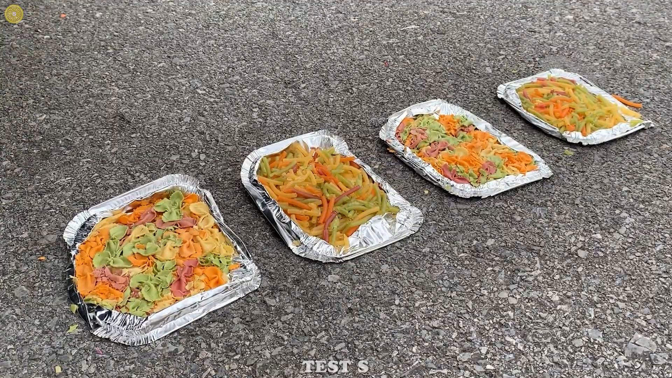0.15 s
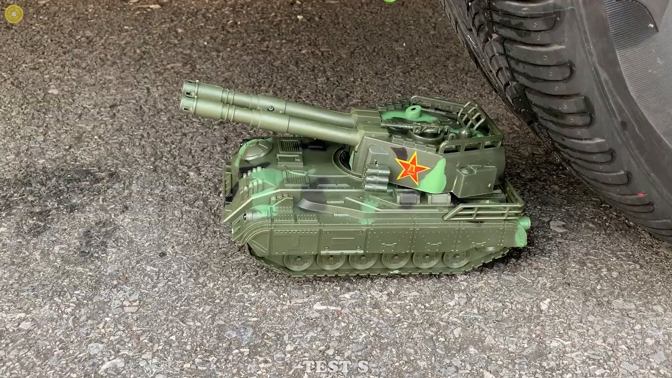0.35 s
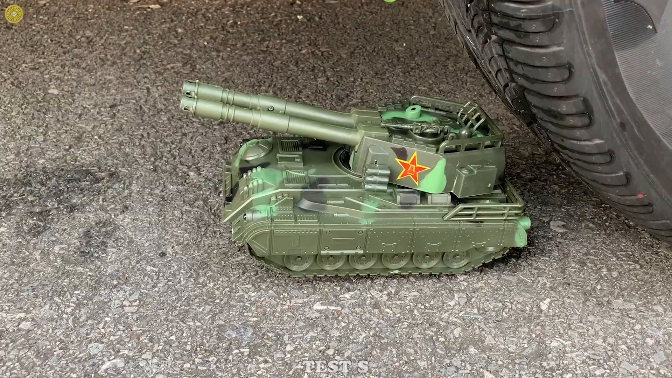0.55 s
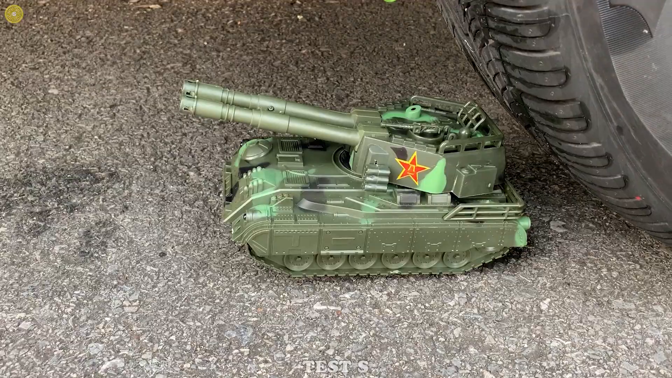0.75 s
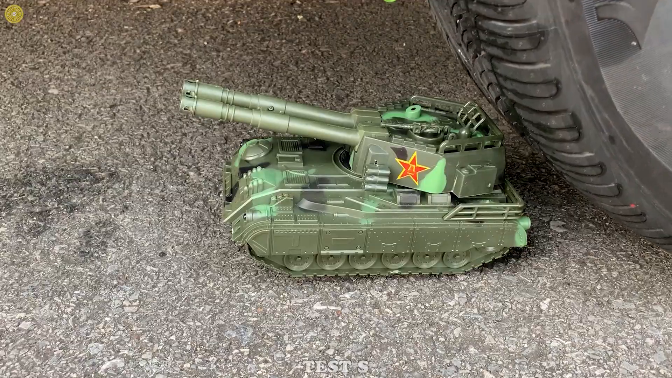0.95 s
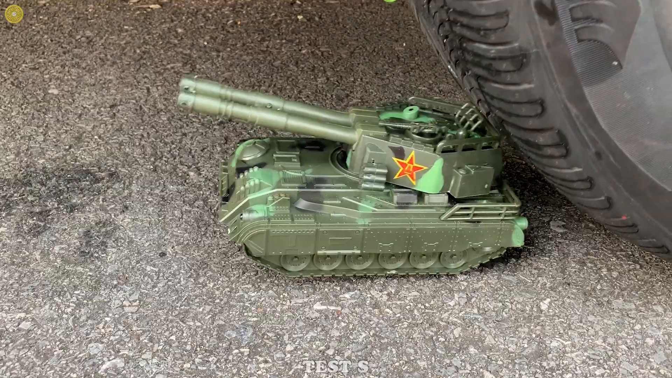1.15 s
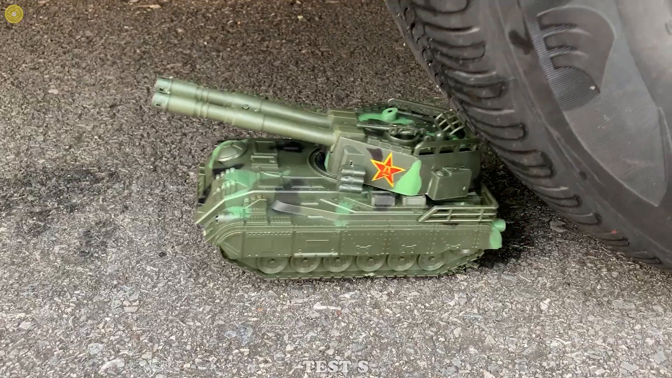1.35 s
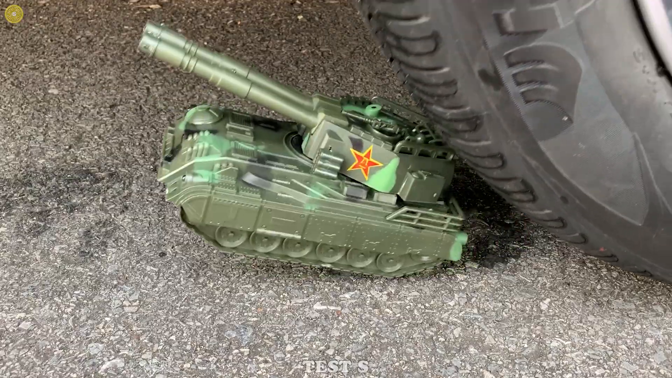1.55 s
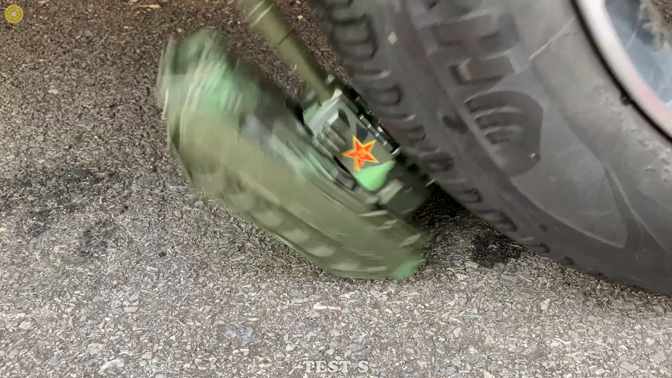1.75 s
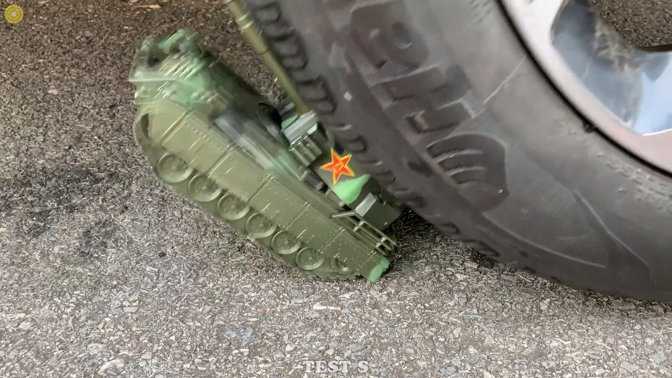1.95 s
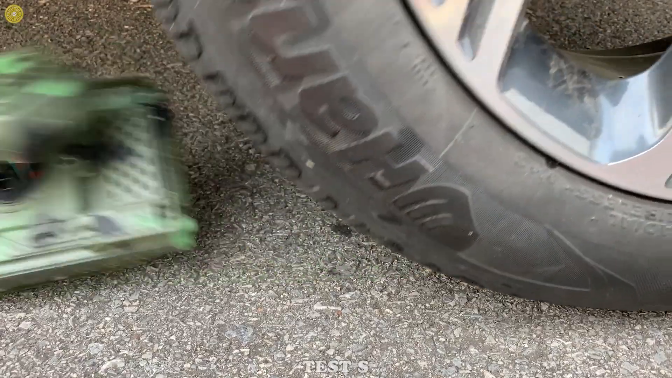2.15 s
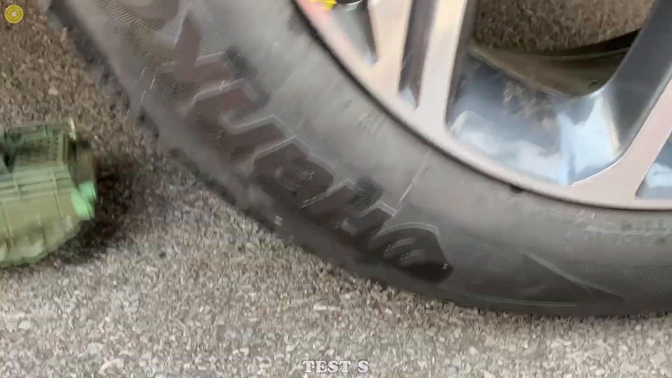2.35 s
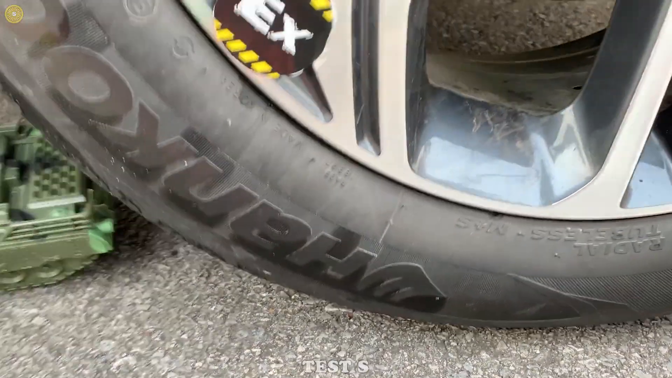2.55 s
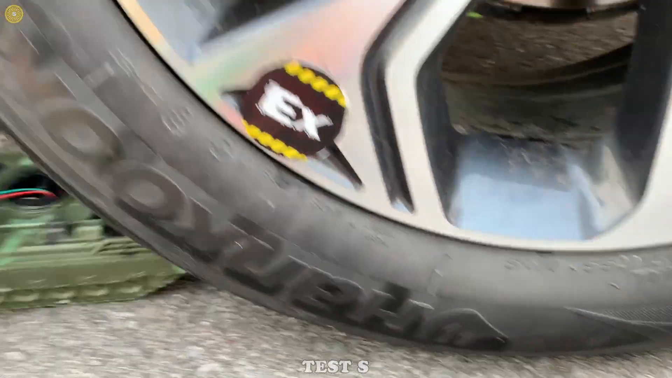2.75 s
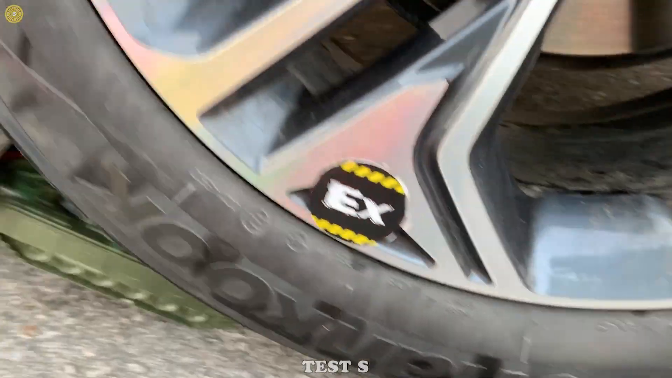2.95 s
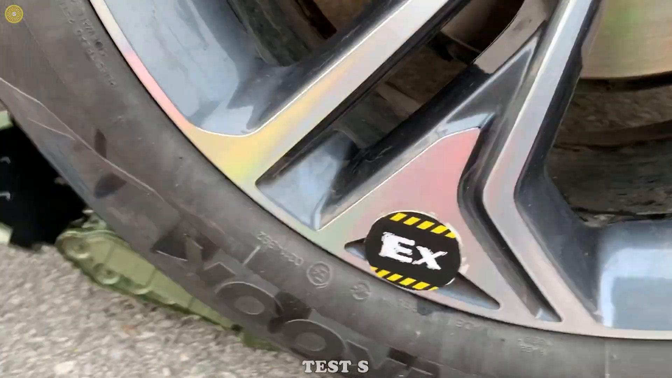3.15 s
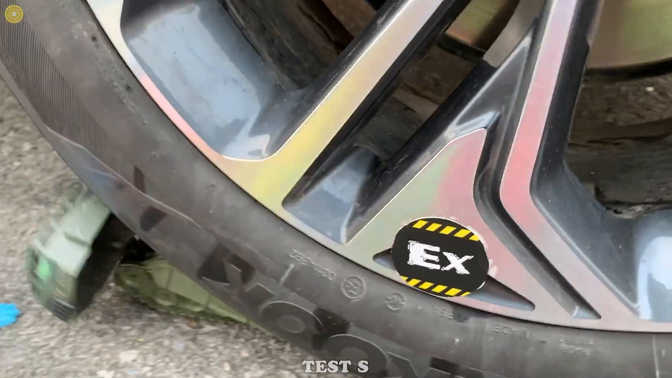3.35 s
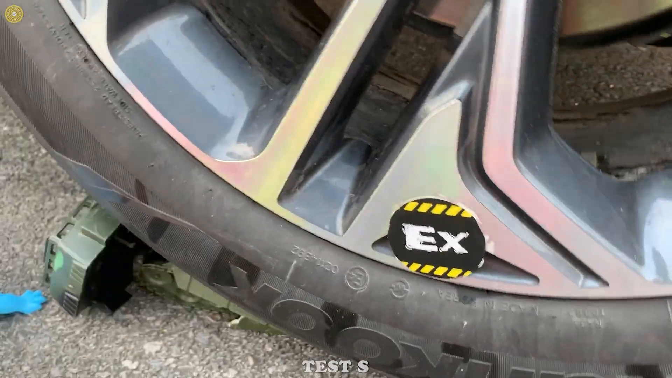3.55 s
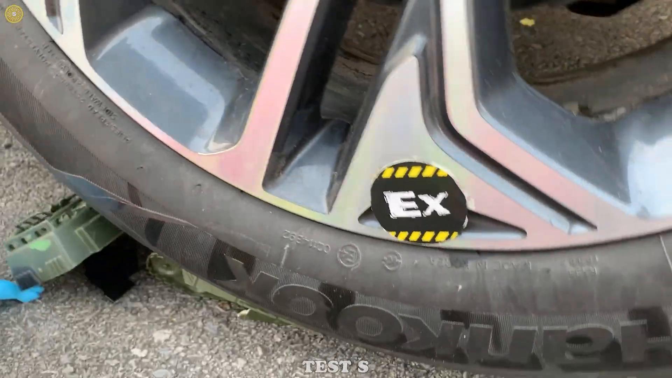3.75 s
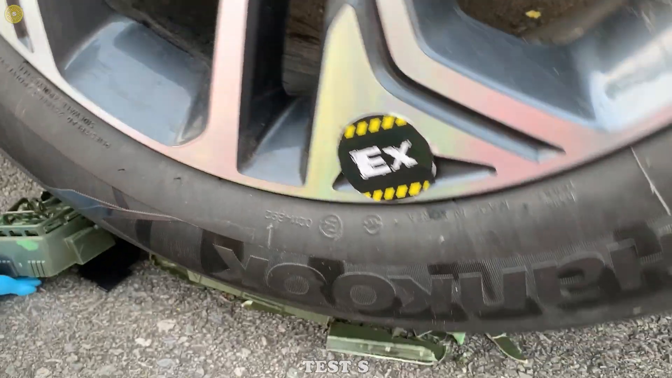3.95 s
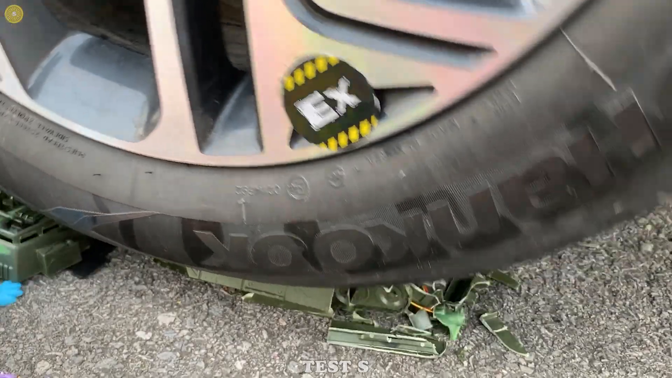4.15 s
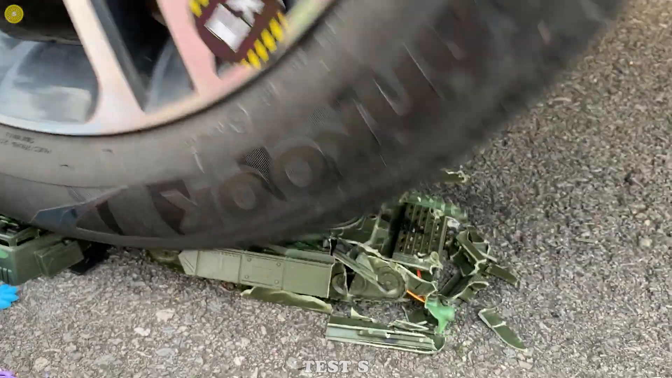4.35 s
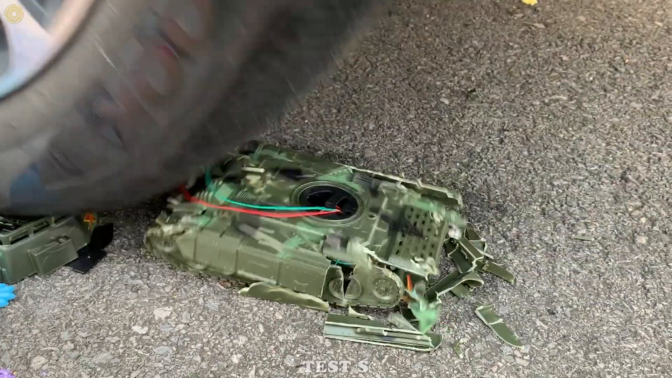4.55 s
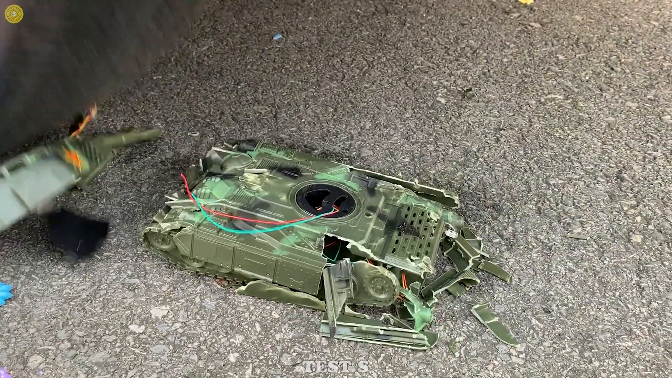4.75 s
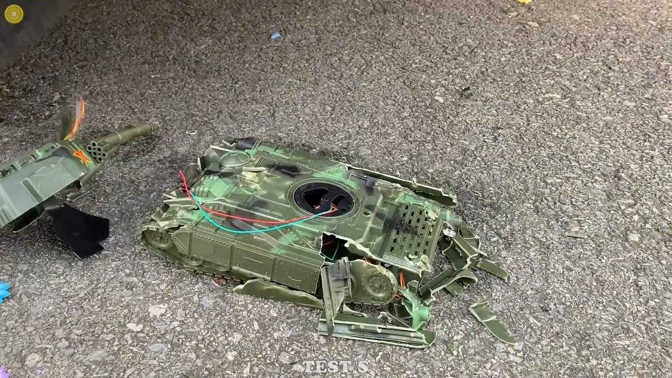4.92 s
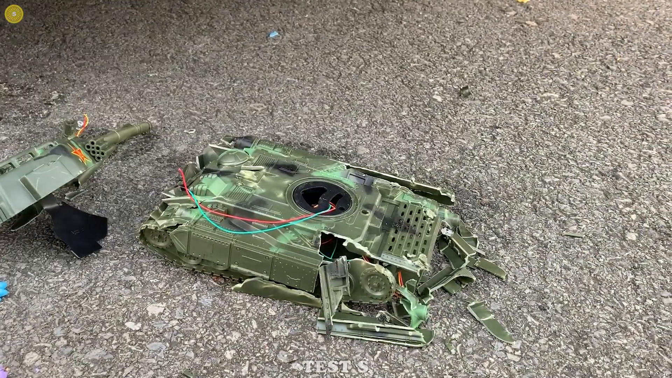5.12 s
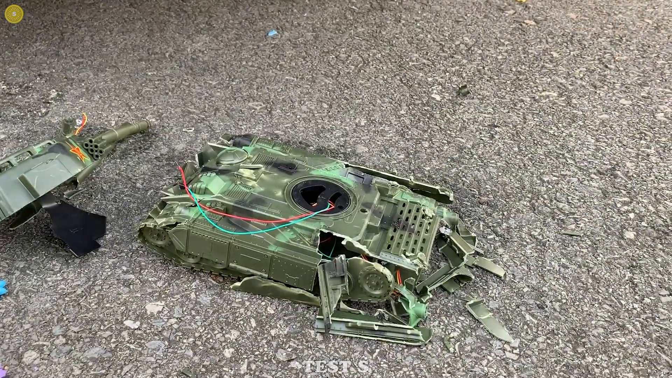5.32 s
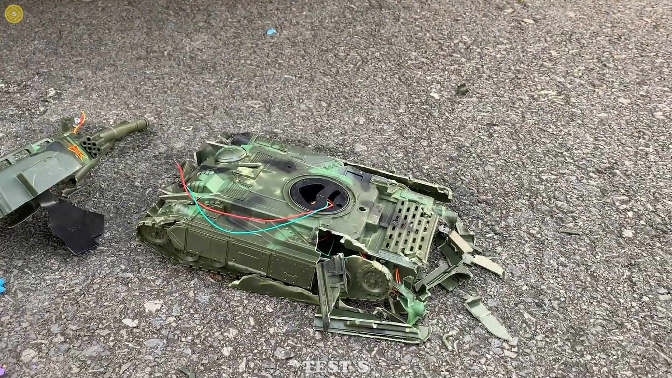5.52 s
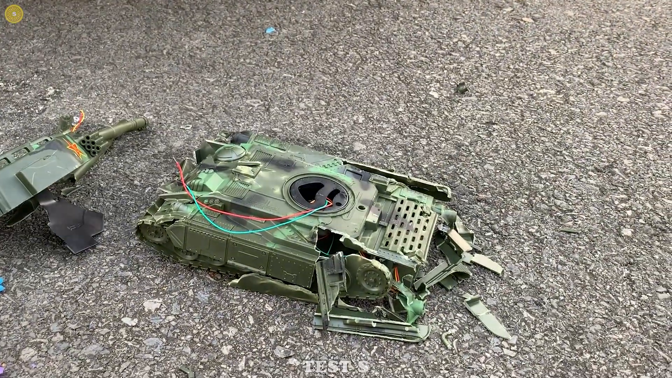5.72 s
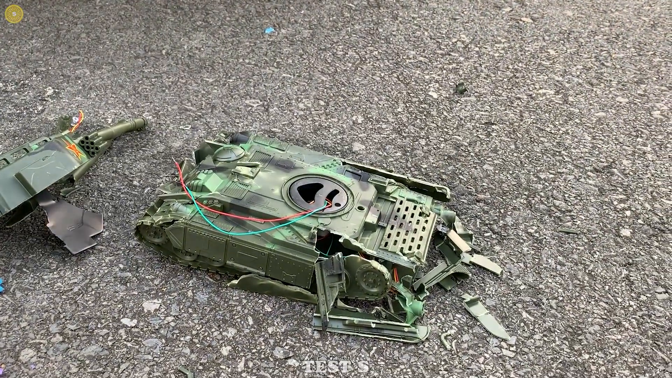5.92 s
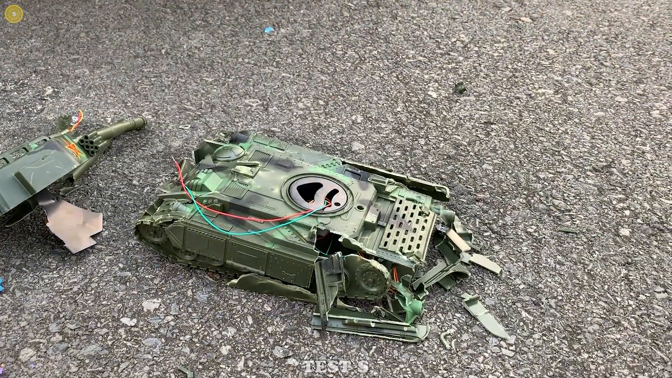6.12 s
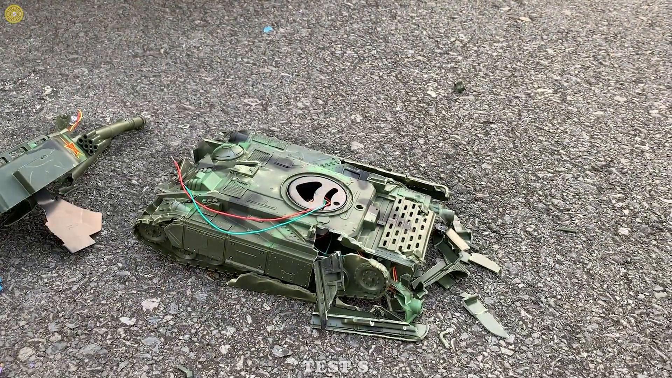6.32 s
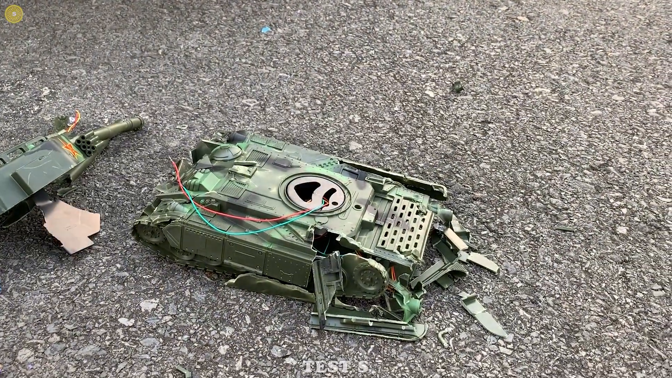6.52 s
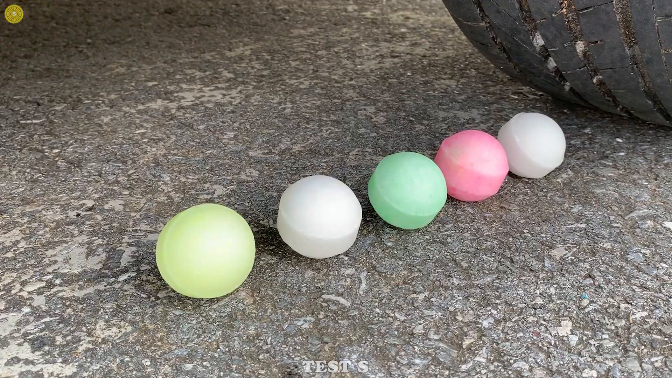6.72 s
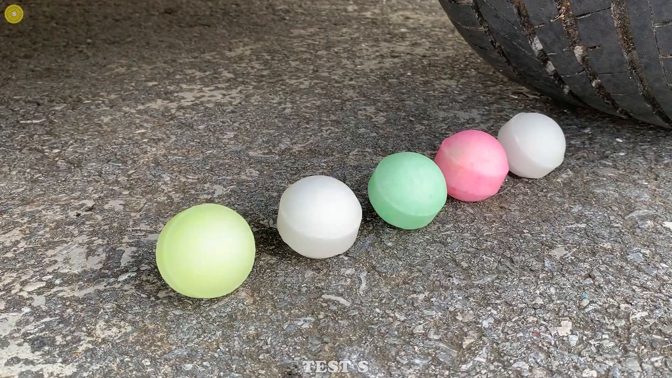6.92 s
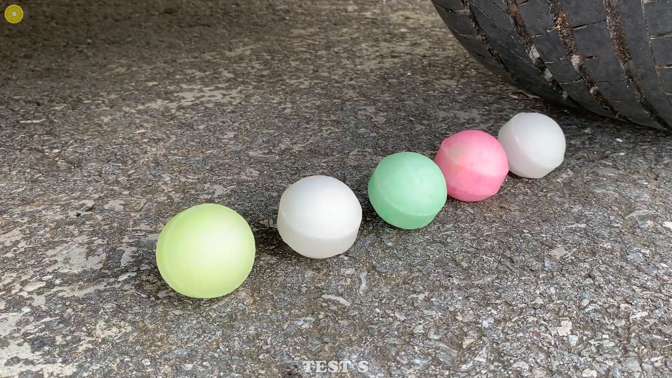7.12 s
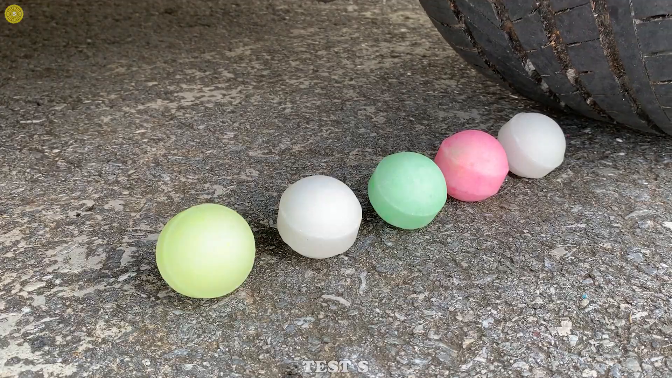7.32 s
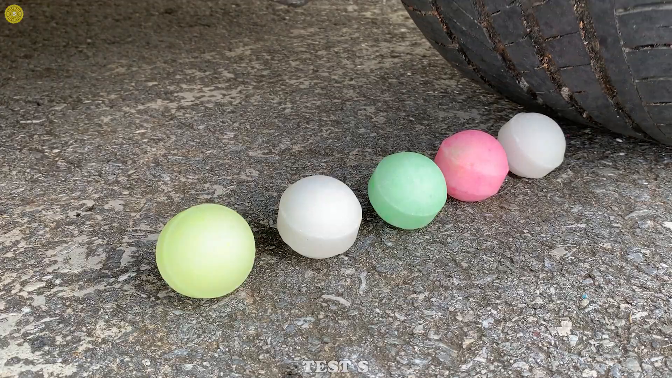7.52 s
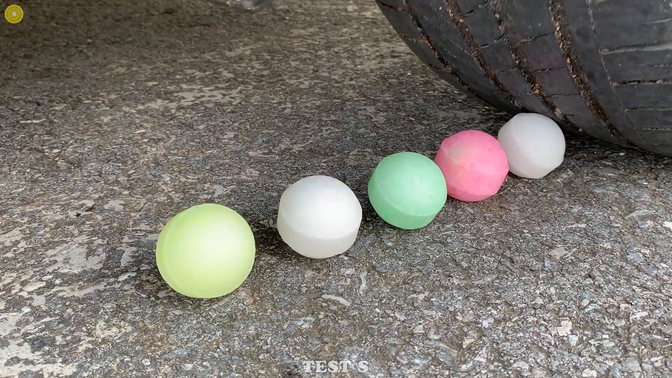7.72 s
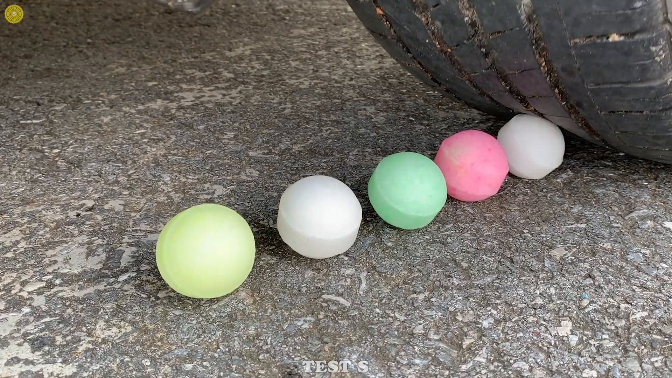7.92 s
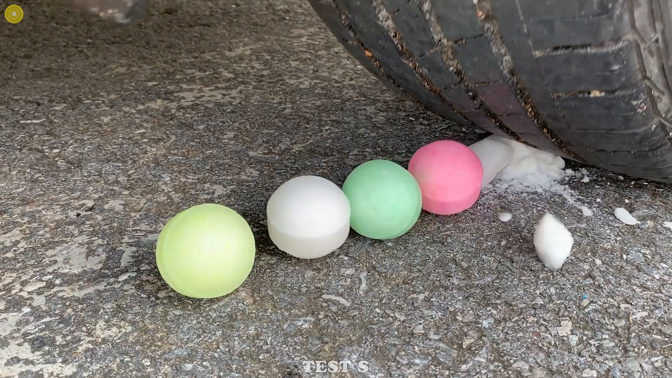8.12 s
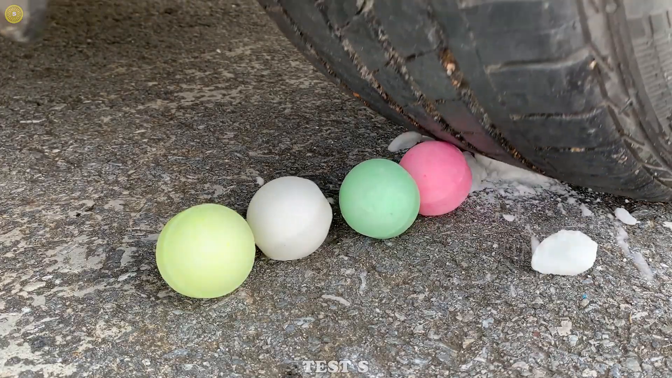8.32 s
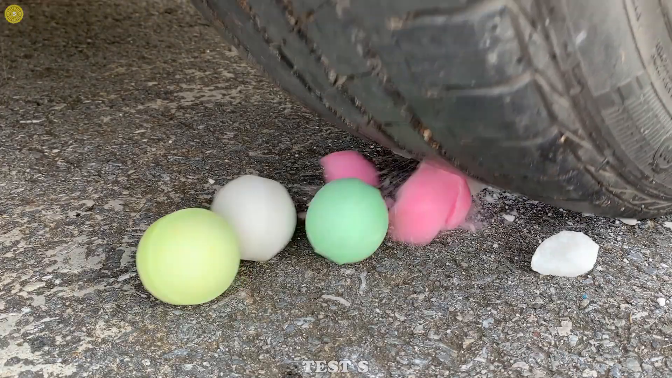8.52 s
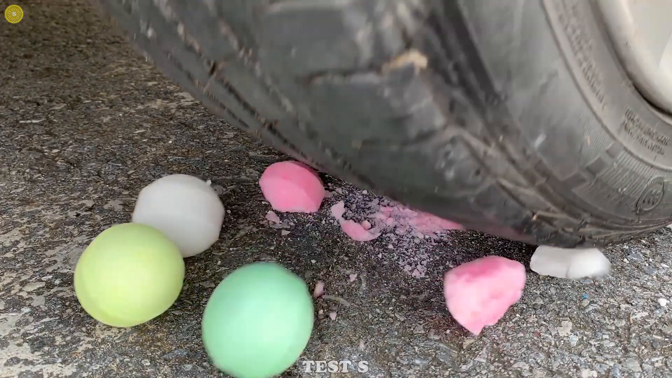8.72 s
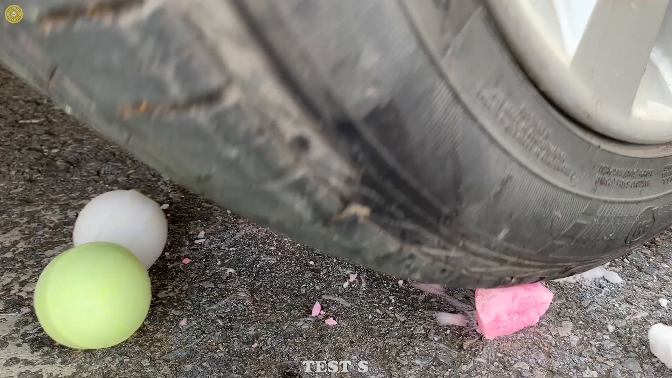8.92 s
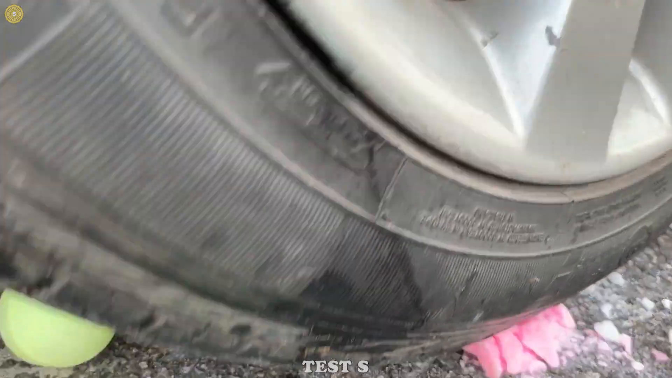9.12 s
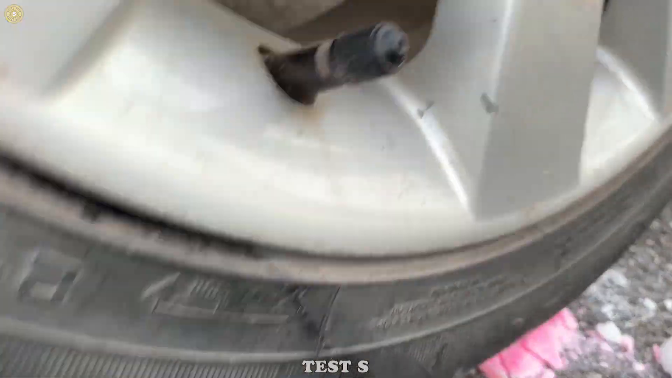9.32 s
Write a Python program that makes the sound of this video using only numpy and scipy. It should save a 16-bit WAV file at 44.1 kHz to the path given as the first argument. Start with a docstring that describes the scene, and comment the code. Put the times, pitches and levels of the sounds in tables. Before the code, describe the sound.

Close to a rumbling car, plastic cracks and crunches violently under a tyre, quiet follows, then chalky balls burst in dense low pops.

```python
"""On asphalt, close to a rumbling and hissing car, a tyre creeps over a plastic toy and a row of brittle balls.
The toy skids, cracks and splinters: swarms of random grains excite a hollow shell and its stiff mouldings.
After a quiet spell the balls snap with dull knocks: falling tones, then grains ringing in ball and tyre.
The car is shaped noise and steady tones; the two-port microphone overloads on the loudest cracks."""
import sys
import numpy as np
from scipy import signal
from scipy.fft import rfft, irfft
from scipy.io import wavfile

SR = 44100
rng = np.random.default_rng(int(sys.argv[2]) if len(sys.argv) > 2 else 0)


def store_wav(level_fs):
    """Save 16-bit WAV to argv[1]."""
    pcm = np.round(np.clip(np.atleast_2d(level_fs), -1, 1) * 32767)
    wavfile.write(sys.argv[1], SR, pcm.T.astype(np.int16))


N = 417627   # length in samples

# plastic cracks: t/s, level/dB, shell pitch f/Hz, brightness/dB, fading length/ms
CRACKS = [(1.684, -7.5, 800, -2, 8.9), (1.726, 2, 517, -6, 4.3), (1.732, 3, 598, -6.5, 13.3),
          (1.803, 15.5, 550, -3, 27.6), (1.8296, -5.5, 448, -23.5, 32), (1.858, 10.5, 830, -7, 13.8),
          (1.897, -15, 920, -8, 9.6), (1.955, 5, 900, -30, 4), (1.968, -4.5, 1180, -20, 47),
          (1.98, 15.5, 904, 2.5, 6.5), (2.0095, 9, 725, 6, 21.4), (2.0248, -9.5, 680, 14.5, 14.3),
          (2.0449, 10.5, 910, -1, 10), (2.1296, -18.5, 1400, -22, 9.2), (2.1991, -16.5, 1050, -2, 5.3),
          (2.226, -8.5, 1410, -4, 21), (2.2988, -0.5, 1110, -3.5, 11), (2.3096, -3.5, 1350, -9, 45),
          (2.404, -8.5, 1000, -1.5, 13.5), (2.43, -7, 1120, 3.5, 9.8), (2.459, -12.5, 810, 1, 35),
          (2.4939, 0, 1500, -10.5, 7.1), (2.518, -15, 830, -4, 6.4), (2.545, -28, 1500, 15, 3.5),
          (2.646, -24.5, 1020, -7, 7.2), (2.805, -18, 1010, -3.5, 34), (2.85, -16.5, 1036, -1, 9.5),
          (2.907, -13.5, 960, -19, 18), (2.9543, -2.5, 1060, -1, 26), (3.016, 7, 1060, -15.5, 10.4),
          (3.0418, -3.5, 1460, -10, 8), (3.0495, 7.5, 1160, 6, 10), (3.0936, 11.5, 1290, 1.5, 6.7),
          (3.1265, 4, 1230, 11, 10), (3.157, 8, 880, -2, 10), (3.195, 5, 330, 7.5, 7.7),
          (3.2623, -6, 780, 7.5, 5.8), (3.2764, -2, 1410, -2, 2.7), (3.299, -6, 1200, 5, 3.1),
          (3.3135, -14.5, 813, -1, 2.6), (3.3574, 10.5, 810, 1, 9.3), (3.412, -11.5, 1410, 7.5, 3.6),
          (3.4302, 1.5, 1470, 5, 4), (3.4795, 7.5, 870, 3.5, 10.5), (3.52, -8, 900, -9.5, 4.4),
          (3.55, -3, 610, 12.5, 3.3), (3.59, -10.5, 1520, 7, 4), (3.6032, 5.5, 1010, 2, 2.9),
          (3.6206, 9.5, 600, 1, 7.2), (3.6473, -4.5, 1000, 5.5, 7.5), (3.686, 7, 1100, -2, 5.4),
          (3.706, 6.5, 1030, 3, 6.4), (3.733, 7.5, 760, 4.5, 5.2), (3.748, 1.5, 900, 2.5, 3.8),
          (3.7728, -0.5, 1504, -15, 3.9), (3.799, 11, 580, 0.5, 6.4), (3.85, -17, 1000, -1.5, 4.9),
          (3.8599, 1.5, 636, 5, 3.2), (3.9378, -3, 1570, -2.5, 2.3), (3.9609, 5, 1080, 1.5, 7.9),
          (3.996, -3, 684, -5, 3.8), (4.064, -26.5, 900, 0, 11), (4.09, 3, 1654, 3.5, 1.6),
          (4.098, -7, 950, 6, 2.5), (4.115, 7, 616, 2, 5.5), (4.132, 9, 894, 3.5, 7.8),
          (4.144, 2.5, 376, -6, 10.2), (4.2412, -1.5, 360, 3.5, 7.8), (4.3138, -1, 1140, 5.5, 1.6),
          (4.333, 6.5, 587, 3.5, 3.8), (4.3478, 1.5, 645, 2, 4.6), (4.364, 3.5, 1190, -1, 7),
          (4.41, -21, 573, -9.5, 5.1), (4.4495, -12.5, 1090, 7, 9.1), (4.4722, -3, 665, 3.5, 4.6),
          (4.4861, 5.5, 517, 2, 6.9), (4.5222, -9.5, 935, 7.5, 1.6), (4.536, 5, 720, 1, 0.6),
          (4.558, -10, 616, 10, 6.7), (4.567, -6, 667, 6, 7.2), (4.6037, -17, 810, 2, 11),
          (4.6153, 4, 527, 3.5, 5.5), (4.6673, -32, 577, -25, 8.1), (4.7254, -20.5, 880, 5.5, 12),
          (4.69, -29, 900, -22, 8.7), (4.757, -31, 970, 14.5, 4.4), (4.778, -38.5, 1000, 19.5, 11)]
# ringing modes of a moulding of size 1: f/Hz, width/Hz, level/dB
MOULDING_MODES = [(1489, 200, 0), (2209, 170, 1), (2678, 140, 3), (3870, 160, 2), (4766, 200, 1)]
# plastic grinding under the tread: t/s, level/dB
GRIND = [(1.18, -48.5), (1.66, -50), (1.7, -25.5), (2.08, -34), (2.19, -71), (2.3, -25.5), (2.55, -46),
         (2.75, -48.5), (3.2, -26), (3.35, -38.5), (4.3, -39), (4.5, -31.5), (4.75, -39.5), (4.85, -56)]
# the tread first leans on the toy, which knocks and squeaks: t/s, peak level/dB, ring f/Hz, fading length/ms
TOUCHES = [(1.196, -20, 2800, 10), (1.316, -30, 1450, 14), (1.338, -24, 2750, 10), (1.381, -29, 1620, 12)]
# balls snapping: t/s, level/dB, base pitch f/Hz, treble tick against the snap/dB
SNAPS = [(8.018, -7, 660, 7.5), (8.042, 1, 475, 0.5), (8.092, -20, 660, -8), (8.171, -11, 630, -12),
         (8.195, -2.5, 659, -12), (8.219, -6.5, 1066, -5), (8.251, -5.5, 1110, -9),
         (8.303, -4.5, 774, -7.5), (8.324, -24, 990, -25), (8.336, -16.5, 1025, -21), (8.39, -11, 906, -10),
         (8.541, 2.5, 504, 0.5), (8.571, -22, 617, 1), (8.605, -3, 1080, -1), (8.645, -26, 830, -24),
         (8.675, -2, 707, -24), (8.68, -3.5, 844, -6), (8.719, -11, 600, -15), (8.73, -6, 770, -14),
         (8.778, -5.5, 490, -14), (8.803, 1, 945, -7), (8.827, 1.5, 512, -9), (8.85, -8.5, 480, -10),
         (8.88, -11.5, 584, -9), (8.903, 0, 611, -10), (8.928, -22.5, 503, 7.5), (8.958, -13, 526, -25),
         (8.981, -5, 917, -6), (8.994, -6, 500, -27.5), (9.003, -8, 610, -10), (9.017, -3.5, 1030, 4.5),
         (9.042, -1, 480, -15), (9.068, -2, 472.5, -21.5), (9.076, -2.5, 625, -10), (9.105, -15, 505, -12),
         (9.117, -19, 600, -22), (9.142, -10, 594, -7), (9.166, -16, 700, -25), (9.17, -2, 800, -16),
         (9.213, -1.5, 645, -16), (9.268, 0.5, 954, -7), (9.304, -1.5, 920, -21), (9.348, -2.5, 890, -3),
         (9.372, 3.5, 560, -10), (9.391, -4.5, 890, -18), (9.411, -7, 586, -17), (9.422, -15, 806, -15),
         (9.451, -11.5, 480, -15)]
# ring of the ball pinched under the tread, higher as it is squeezed: t/s, f/Hz
PINCH = [(8.0, 462), (8.06, 444), (8.18, 366), (8.65, 362), (8.68, 434), (8.81, 369), (8.9, 537),
         (8.99, 376), (9.08, 436), (9.3, 388), (9.47, 298)]
# modes of the tyre wall: f/Hz, width/Hz, typical level/dB
TYRE_MODES = [(112, 25, -1.5), (235, 80, -3)]
# crumbs of the balls grinding: t/s, thud level/dB
CRUMBS = [(8.0, -21), (8.05, -7.5), (8.11, -18), (8.17, -16.5), (8.33, -15.5), (8.42, -26), (8.53, -25),
          (8.56, -10), (8.78, -22), (8.92, -20), (9.02, -10.5), (9.13, -22.5), (9.29, -11.5), (9.47, -13.5)]
# grit and chips ticking: t/s, peak level/dB, centre f/Hz
TICKS = [(.098, -31.5, 7400), (4.928, -23.5, 3330), (5.012, -19.5, 7950), (5.167, -30.5, 8000),
         (6.17, -41, 3544), (6.319, -41, 5050), (6.753, -23, 6950), (7.31, -26.5, 9000)]
# where the wheel is: t/s, left port above right/dB, lead of the left port/ms
WHEEL_PLACE = [(0, -7, 0.27), (4.8, -0.5, 0.2), (7.9, -3, 0.03), (9.47, 6, 0.13)]
# engine and street, steady within each stretch of time:
# start t/s, fade into it/s, rumble level/dB, hum level/dB, hiss level/dB, firing f/Hz, engine orders level/dB
STRETCHES = [(0, 0.012, -40.5, -53.5, -61.5, 19, -51), (.37, 0.014, -36.5, -46, -48.5, 24.6, -46.5),
             (4.5, 0.52, -48, -56.5, -64, 28.8, -48), (6.68, 0.016, -38.5, -38.5, -49, 20.2, -43.5)]
# engine orders 1, 2, 3 .. of the firing rate: relative level/dB
ORDER_LEVELS = [-3, -.5, 1.5, -5, -8, -2, -12, -12]
# a tone that comes up under load: t/s, f/Hz, level/dB
DRONE = [(2.9, 185, -36.5), (3.2, 202.4, -28.5), (4.6, 198.3, -37), (4.9, 195.4, -54.5), (6.68, 194.6, -62)]
# narrow tones and one band of hiss: f/Hz, width/Hz, level/dB, start t/s, end t/s
WHINE = [(13600, 2500, -62, 6.69, 9.47), (8640, 50, -74, 6.69, 9.47), (12941, 12, -66, 6.69, 9.47),
         (1895, 10, -66, 5.57, 5.68), (587, 2.5, -52, 6.69, 9.47), (310, 14, -59, 4.6, 6.68),
         (636, 8, -67, .38, 6.68), (400, 6, -68, 4.6, 6.68)]
# spectrum of the rumble: f/Hz, relative level per Hz/dB
RUMBLE = [(12, -41.5), (20, 0), (92, 6.5), (140, -9), (156, -1.5), (176, -2), (200, -35), (260, -57)]
# spectrum of the hum: f/Hz, relative level per Hz/dB
HUM = [(71, -50), (120, 4), (151, -14.5), (194, -2.5), (400, -13), (571, -12.5), (617, -13.5),
       (1200, -24.5), (1560, -71)]
# spectrum of the hiss: f/Hz, relative level per Hz/dB
HISS = [(410, -46), (700, -19), (1130, -17.5), (1240, -14), (2690, -15), (3190, -19), (4240, -19),
        (7220, -25.5), (8880, -25), (11400, -30), (13400, -25.5), (15500, -37)]
# spectrum of distant traffic: f/Hz, relative level per Hz/dB
FAR_HISS = [(350, -32), (600, 5.5), (647, -5.5), (821, -15.5), (2100, -10.5), (12000, -44.5),
            (15600, -82.5)]
# how alike left and right are in the car noise: f/Hz, likeness (1 = the same)
LIKENESS = [(60, 0.96), (240, 0.88), (950, 0.016), (3770, 0.0381), (15000, 0.1)]
# dips and a peak in the overall tone: f/Hz, width/Hz, level/dB
OVERALL_TONE = [(7300, 3400, -7), (8380, 1300, 5.5), (11580, 2400, -39)]

# Boom against fracture for a 700 Hz shell at 0 dB level and brightness; higher (smaller) shells,
# harder and brighter cracks boom less (the last two in dB per dB).
SHELL_DB, SHELL_DB_PER_OCTAVE, SHELL_YIELDS, SHELL_THINS = -4, -4.5, .12, .15
# A shell is sharp by this share at the crack and sags as it splits.
SHELL_SAG, SHELL_SAG_MS, SHELL_WIDTH_HZ = 0.084, 5, 260
SWELL_SHARE, SWELL_FROM, TAIL_POWER = .4, 0.55, 1.2   # of the length; starting height; 1 = exponential tail
FADE_IN_DB, FADE_IN_MS = -27.5, 4   # each crack fades in over a few ms
SPLINTER_DB, SPLINTER_FOLLOWS = -12.5, 0.77   # at 0 dB of grinding; share of its swing
KNOCK_DB, KNOCK_FOLLOWS = 0.5, 0.48   # at a 0 dB snap; dB gained per dB: soft snaps are mostly knock
PINCH_WIDTH_HZ, PINCH_DB = 49, 7.5
CRUNCH_DB = -14.5   # crunch against thud
FAR_DB = -66
STOP_HZ = 16000   # from here up the top cut removes at least 50 dB


def cracks():
    """Each crack is a swarm of micro-fractures that swells and stops; the hollow shell booms a little longer."""
    out = np.zeros((2, N))
    ms = np.arange(-SR // 50, SR // 6) / SR * 1000   # 0 is the crack itself
    for s, level_db, shell_hz, treble_db, length in CRACKS:
        shell_db = SHELL_DB + SHELL_DB_PER_OCTAVE * np.log2(shell_hz / 700)
        shell_db -= SHELL_YIELDS * level_db + SHELL_THINS * treble_db
        rise = SWELL_SHARE * length      # long swarms also swell slowly
        swell = SWELL_FROM + (1 - SWELL_FROM) * np.minimum(ms / rise, 1)
        shape = swell * np.exp(-(np.maximum(ms - rise, 0) / length) ** TAIL_POWER)
        fade_in = min(amp(FADE_IN_DB + level_db), .14) * np.exp(ms / FADE_IN_MS)
        shape = np.where(ms < 0, fade_in, shape)
        bursts = np.abs(band(grains(len(ms), per_s=240, spread_db=9.0), 19, 200))
        chips = (ms > 0) * amp(-8.5) * peak_one(bursts) * np.exp(-ms / 60)
        swarm = pair(len(ms), per_s=9000, spread_db=3.5, apart=0.5) * (shape + chips)
        common = swarm.mean(axis=0)      # long waves reach both ports alike
        pitch_hz = shell_hz * (1 + SHELL_SAG * np.exp(-np.abs(ms) / SHELL_SAG_MS))
        shell = glide(common, pitch_hz, SHELL_WIDTH_HZ)
        shell += 0.5 * band(common, 200, 1400) + 0.48 * band(common, 60, 420)
        sound = plastic_ring(swarm, treble_db, rng.uniform(0.82, 1.2)) + amp(shell_db) * peak_one(shell)
        sound = echoes(sound, count=3, echo_db=-9, longest_ms=6)
        add(out, s + ms[0] / 1000, amp(level_db) * sound)
    return out


def plastic_ring(x, treble_db, size=1):
    """Broad sound of the fracture plus the short modes of a moulding: the larger, the lower they ring."""
    broad = peak_one(band(x, 640, 6850)) + amp(treble_db) * peak_one(band(x, 5000, 14000))
    return broad + sum(amp(db) * resonate(broad, hz / size, width) for hz, width, db in MOULDING_MODES)


def grind():
    """The toy skids and is ground down: clumped grains in shell, mouldings and splinters."""
    body_db, = in_time(GRIND, -120)
    splinter_db = np.minimum(SPLINTER_DB + (SPLINTER_FOLLOWS - 1) * body_db, 12)   # against the body
    rasp = pair(N, per_s=1800, spread_db=4, apart=.4) * amp(6 * drift(100))
    common = rasp.mean(axis=0)
    body = rms_one(band(common, 250, 1200)) + amp(-5) * rms_one(band(common, 35, 180))
    mouldings = 1.1 * rms_one(plastic_ring(rasp, treble_db=-33.0))
    splinters = rms_one(band(rasp, 5700, 17000))
    return amp(body_db) * (body + mouldings + amp(splinter_db) * splinters)


def touches():
    """Small rubs that ring on one note and, more faintly, on a lower one."""
    out, ms = np.zeros((2, N)), np.arange(SR // 12) / SR * 1000
    for s, peak_db, hz, length in TOUCHES:
        rub = pair(len(ms), per_s=3300, spread_db=2.5, apart=1.0)
        rub = rub * np.minimum(ms / 3, 1) * np.exp(-ms / length)
        ring = resonate(rub, hz, 260) + amp(-4) * resonate(rub, .6 * hz, 160)
        ring += amp(-21) * band(rub, 500, 3500)
        add(out, s, amp(peak_db) * peak_one(ring))
    return out


def snaps():
    """A snap sweeps down in pitch within a few cycles, then the pinched ball and the tyre knock on."""
    out, t = np.zeros((2, N)), np.arange(SR // 8) / SR
    for s, level_db, snap_hz, treble_db in SNAPS:
        knock_db = KNOCK_DB + (KNOCK_FOLLOWS - 1) * level_db   # against the snap
        hz = snap_hz * (0.888 + 2.76 * np.exp(-t / 0.000863))
        sweep = np.sin(2 * np.pi * (np.cumsum(hz) / SR + rng.random()))
        sweep *= (1 - np.exp(-t / .0004)) * np.exp(-(t / .0045) ** 2)
        dust = pair(len(t), per_s=3400, spread_db=4.5, apart=0.2)
        blow = dust * amp(-60 * t / 0.012)   # falls 60 dB in 12 ms
        ball = peak_one(resonate(blow, np.interp(s, *np.transpose(PINCH)), PINCH_WIDTH_HZ))
        tail = peak_one(band(dust * amp(-60 * t / 0.15), 41, 810))
        knock = amp(PINCH_DB) * ball + peak_one(tyre(blow)) + 1.2 * tail
        knock = peak_one(band(knock, 39, 890))
        tick = peak_one(band(dust * amp(-60 * t / 0.015), 1500, 9000))
        crumble = band(band(dust * amp(-60 * t / 0.016), 460, 1070), 376, 1300)
        sound = sweep + amp(4.5) * peak_one(crumble) + amp(knock_db) * knock + amp(treble_db) * tick
        add(out, s, amp(level_db) * sound)
    return out


def tyre(x):
    """The tyre wall rings, its modes a little louder or softer each time."""
    return sum(amp(db + 1.9 * rng.normal()) * resonate(x, hz, width) for hz, width, db in TYRE_MODES)


def crumbs():
    """Balls are pressed to powder: dull lumpy grains shake the tyre wall and make the pinched ball groan."""
    thud_db, = in_time(CRUMBS, -120)
    lumps = pair(N, per_s=600, spread_db=3, apart=.25) * amp(3 * drift(50))
    powder = pair(N, per_s=1500, spread_db=5.0, apart=.4) * amp(6.4 * drift(40))
    crunch = rms_one(band(band(lumps, 260, 1100), 220, 2100))
    crunch += amp(-22.0) * rms_one(band(powder, 1400, 7000))
    thud = rms_one(band(0.64 * band(lumps, 40, 330) + tyre(lumps), 36, 540))
    groan = rms_one(glide(lumps, in_time(PINCH)[0], PINCH_WIDTH_HZ))
    return amp(thud_db) * (thud + amp(-7.0) * groan + amp(CRUNCH_DB) * crunch)


def ticks():
    """Grit and chips of plastic drop: very short bursts of grains in a band around each centre."""
    out, t = np.zeros((2, N)), np.arange(SR // 12) / SR
    for s, peak_db, centre_hz in TICKS:
        burst = pair(len(t), per_s=2500, spread_db=0.5, apart=0.58) * amp(-60 * t / 0.087)
        tick = band(burst, centre_hz / 3, 2 * centre_hz)
        add(out, s, amp(peak_db) * peak_one(tick))
    return out


def car():
    """Shaped noise makes rumble, hum, hiss and far traffic; sines make engine orders and a drone."""
    rumble_db, hum_db, hiss_db, firing_hz, orders_db = stretches()
    out = amp(rumble_db) * coloured(RUMBLE, patchy_db=-1.5)
    out += amp(hum_db) * coloured(HUM, patchy_db=-2.0)
    hiss = echoes(coloured(HISS, patchy_db=1.5), count=5, echo_db=-5.5, longest_ms=8.3)
    out += amp(hiss_db) * hiss + amp(FAR_DB) * coloured(FAR_HISS, patchy_db=0.0)
    t = np.arange(N) / SR
    for hz, width_hz, level_db, start, end in WHINE:
        tone = rms_one(resonate(rng.standard_normal((2, N)), hz, width_hz))
        out += amp(level_db) * tone * (t > start) * (t < end)
    drone_hz, drone_db = in_time(DRONE)[0], in_time(DRONE, -120)[1]
    out += amp(drone_db + 2 * drift(23)) * np.sin(2 * np.pi * np.cumsum(drone_hz) / SR)
    turns = np.cumsum(firing_hz * (1 + .006 * drift(4))) / SR   # firing cycles, slightly uneven
    for multiple, order_db in enumerate(ORDER_LEVELS, 1):
        tone = np.sin(2 * np.pi * (multiple * turns + rng.random()))
        out += amp(orders_db + order_db + 2.5 * drift(8)) * tone
    return out


def stretches():
    """Levels and firing rate hold within a stretch and fade to the next."""
    corners = []
    for (_, _, *old), (s, fade, *new) in zip(STRETCHES[:1] + STRETCHES, STRETCHES):
        corners += [(s, *old), (s + fade, *new)]
    return in_time(corners)


def coloured(spectrum, patchy_db):
    """Stereo noise of a given spectrum and left-right likeness; rms 1 before its level wanders."""
    log_hz = np.log(np.fft.rfftfreq(N, 1 / SR) + 1)
    table_hz, table_db = np.transpose(spectrum)
    gain = amp(np.interp(log_hz, np.log(table_hz), table_db, -90, -90))
    table_hz, likeness = np.transpose(LIKENESS)
    alike = np.clip(np.interp(log_hz, np.log(table_hz), likeness), -.99, .99)
    mid, side = rfft(rng.standard_normal((2, N)))
    both = np.sqrt(1 + alike) * mid + np.sqrt(1 - alike) * side * [[1], [-1]]
    return rms_one(irfft(gain * both, N)) * amp(patchy_db * drift(18))


def echoes(x, count, echo_db, longest_ms):
    """Ground, wheel and car floor send a few close reflections that ripple the spectrum."""
    out = x.copy()
    for lag in (rng.uniform(.1, 1, count) * longest_ms * SR / 1000).astype(int):
        out[..., lag:] += amp(echo_db) * rng.choice([-1, 1]) * x[..., :-lag]
    return out


def add(out, s, sound):
    """Mix a short sound in at time s, placed by where the wheel is, each piece a little aside."""
    times, pans_db, leads_ms = np.transpose(WHEEL_PLACE)
    aside = rng.normal(0, 1, 2)
    pan_db = np.interp(s, times, pans_db) + 2 * aside[0]
    lead_ms = np.interp(s, times, leads_ms) * (1 + 0.32 * aside[1])
    lag = max(round(lead_ms * SR / 1000), 0)
    sound = sound * amp([[pan_db / 2], [-pan_db / 2]])
    for port, i in enumerate([round(s * SR), round(s * SR) + lag]):
        out[port, i:i + sound.shape[1]] += sound[port, :N - i]


def pair(size, per_s, spread_db, apart):
    """Grains at both ports: a common part and a part that each hears alone."""
    alone = np.array([grains(size, per_s, spread_db) for port in "LR"])
    return grains(size, per_s, spread_db) + apart * alone


def grains(size, per_s, spread_db):
    """Random clicks of uneven size over a trace of noise; rms 1."""
    sizes = amp(spread_db * np.minimum(rng.exponential(1, size), 5)) * rng.choice([-1, 1], size)
    clicks = sizes * (rng.random(size) < per_s / SR)
    return rms_one(clicks + 1e-3 * rng.standard_normal(size))


def drift(rate):
    """Slow random wandering with spread 1 at its knots, of which there are rate per second."""
    knots = rng.standard_normal(N // 200)
    return np.interp(np.arange(N) * rate / SR, np.arange(len(knots)), knots)


def resonate(x, hz, width_hz):
    """Two-pole resonance with gain about 1 on top."""
    r = np.exp(-np.pi * width_hz / SR)
    feedback = [1, -2 * r * np.cos(2 * np.pi * hz / SR), r * r]
    return signal.lfilter(np.array([1, 0, -1]) * (1 - r * r) / 2, feedback, x)


def glide(x, hz, width_hz):
    """Resonance whose centre follows a curve: shift it to 0 Hz, smooth, shift back."""
    r, turn = np.exp(-np.pi * width_hz / SR), np.exp(2j * np.pi * np.cumsum(hz) / SR)
    return 2 * np.real(turn * signal.lfilter([1 - r], [1, -r], x / turn))


def band(x, low_hz, high_hz):
    """Butterworth band-pass."""
    edges = [low_hz, min(high_hz, .45 * SR)]
    return signal.sosfilt(signal.butter(2, edges, "band", fs=SR, output="sos"), x)


def in_time(rows, outside=None):
    """Table columns as curves over all samples."""
    s, *columns = np.transpose(rows)
    return [np.interp(np.arange(N) / SR, s, c, outside, outside) for c in columns]


def amp(db):
    """Decibels to gain."""
    return 10 ** (np.asarray(db) / 20)


def rms_one(x):
    """Scale to rms 1."""
    return x / np.sqrt(np.mean(x ** 2) + 1e-20)


def peak_one(x):
    """Scale to peak 1."""
    return x / np.max(np.abs(x))


def scene():
    """Car, toy and balls."""
    return car() + touches() + cracks() + grind() + ticks() + snaps() + crumbs()


def record(dry):
    """Tone dips and peak, hard overload, steep top cut."""
    for hz, width_hz, level_db in OVERALL_TONE:
        dry = dry - (1 - amp(level_db)) * resonate(dry, hz, width_hz)
    flat = dry / (1 + np.abs(dry / .98) ** 8) ** (1 / 8)   # bends sharply just below full scale
    top_cut = signal.cheby2(16, 50, STOP_HZ, fs=SR, output="sos")
    return np.clip(signal.sosfilt(top_cut, flat), -1, 1)


dry = scene()
out = record(dry)
store_wav(out)
```